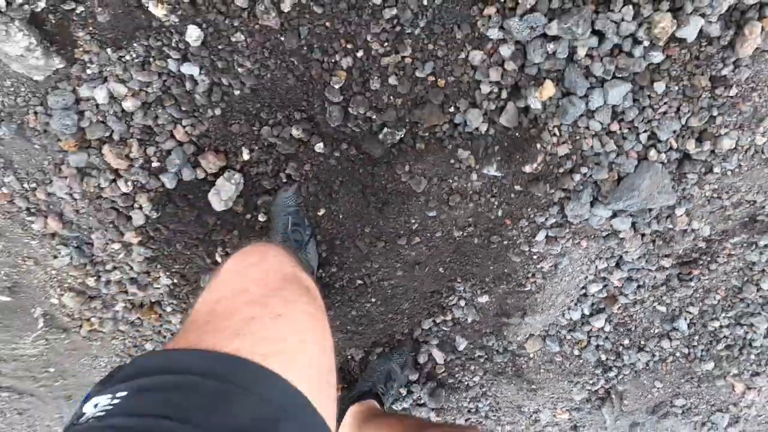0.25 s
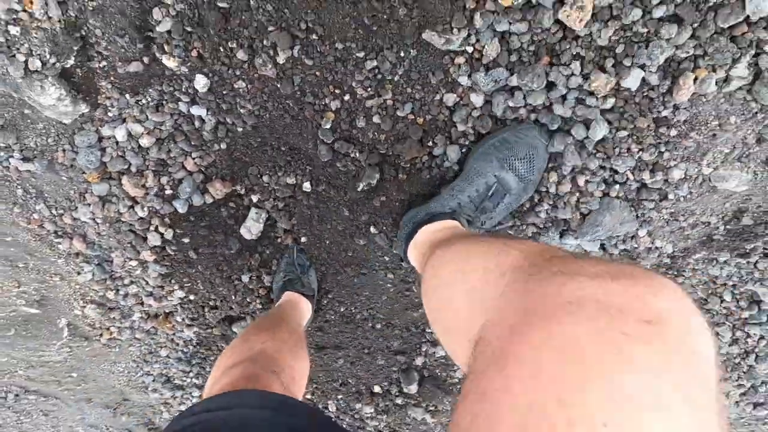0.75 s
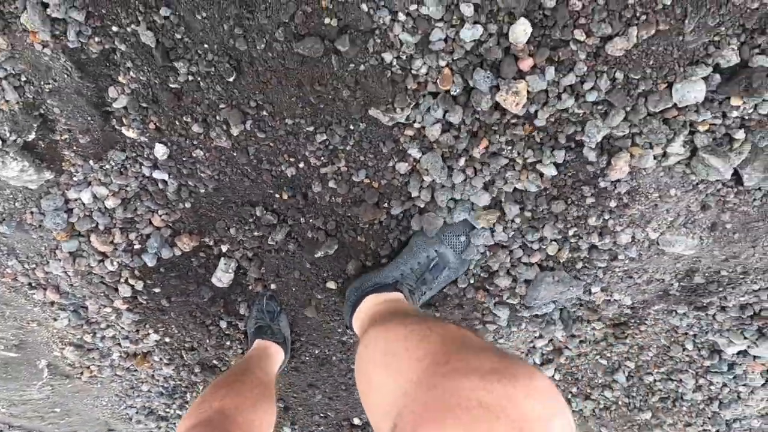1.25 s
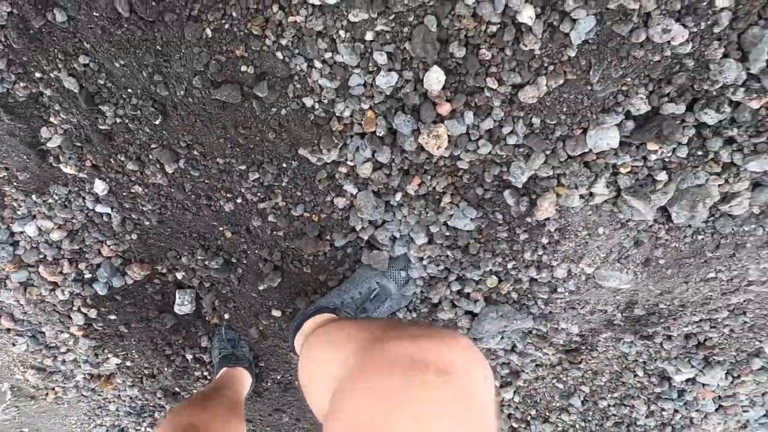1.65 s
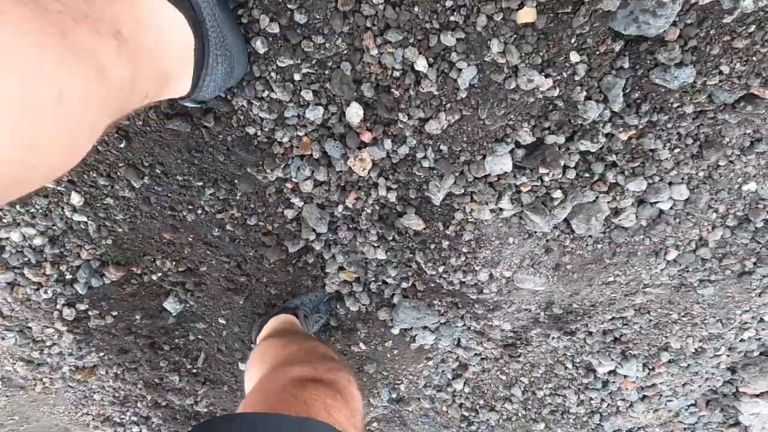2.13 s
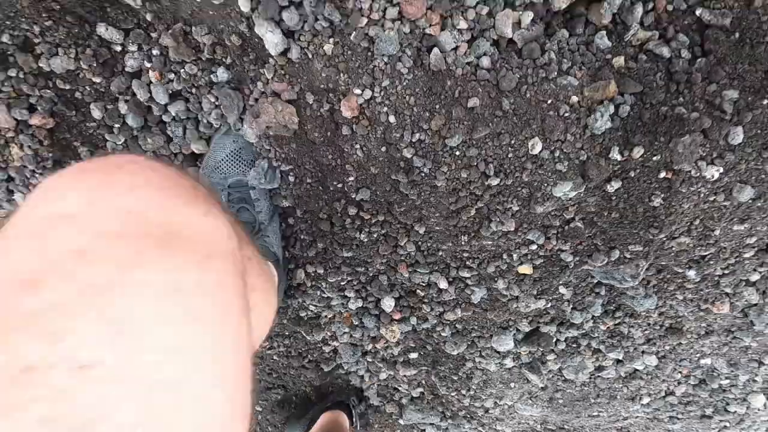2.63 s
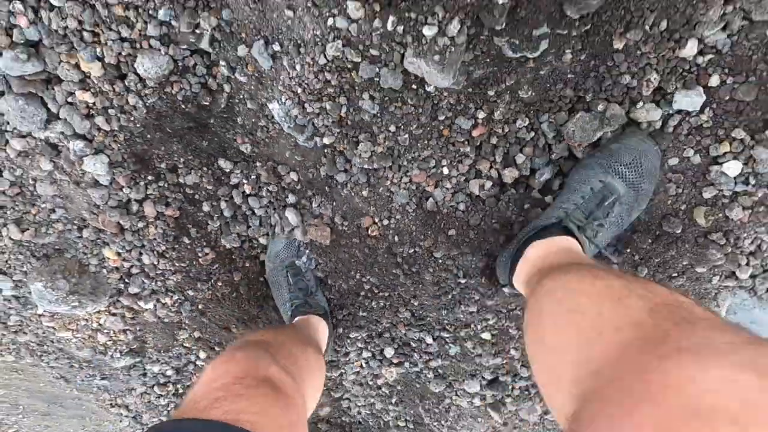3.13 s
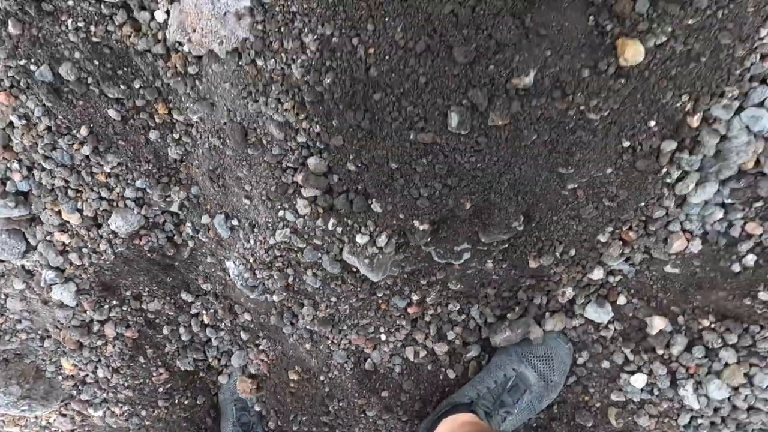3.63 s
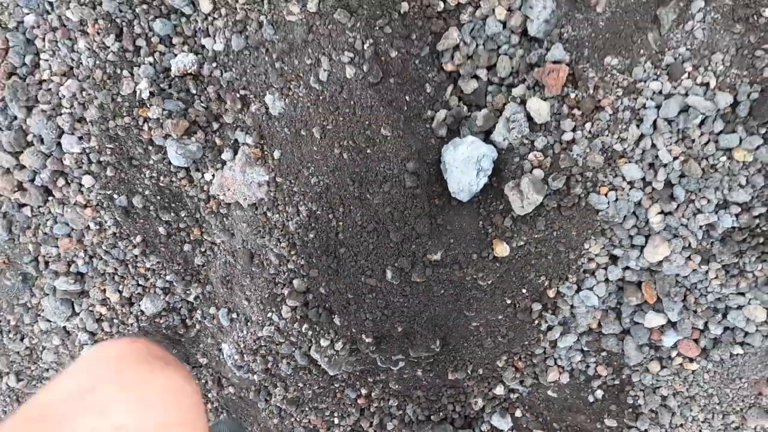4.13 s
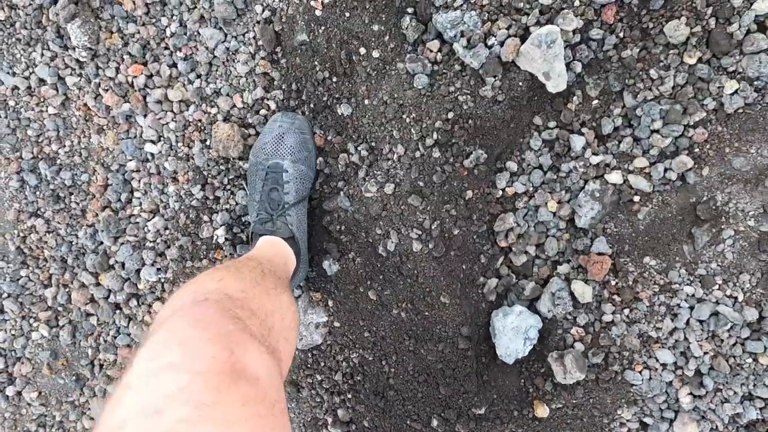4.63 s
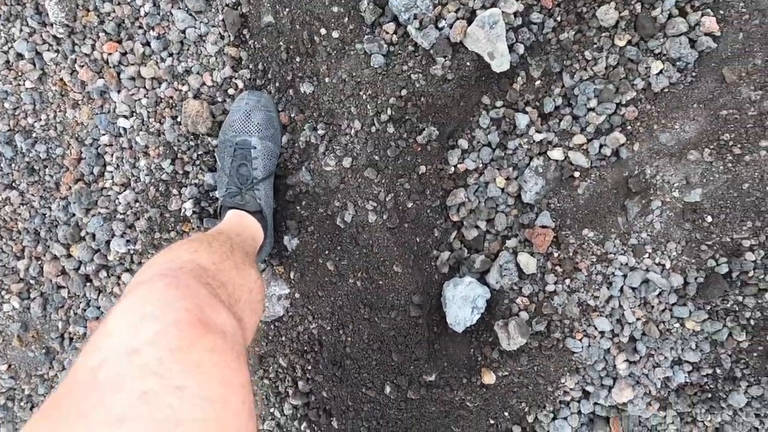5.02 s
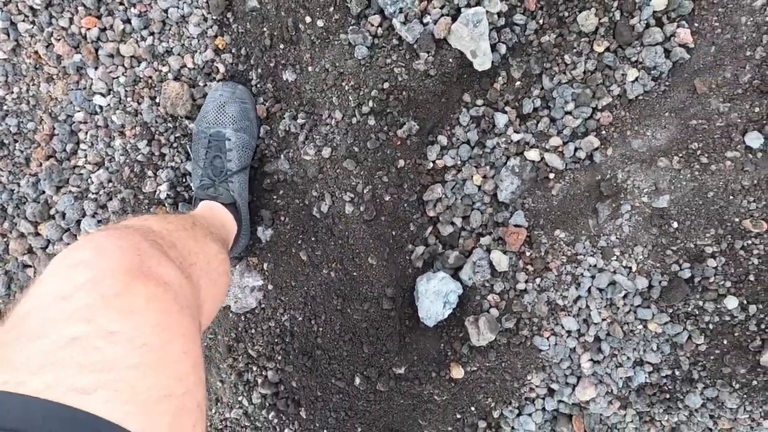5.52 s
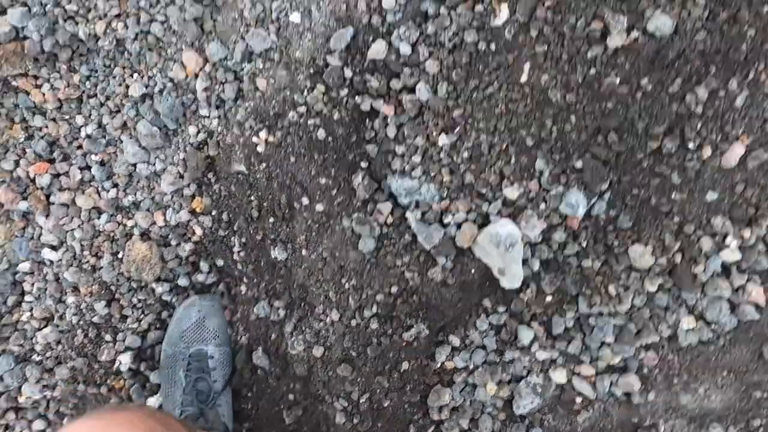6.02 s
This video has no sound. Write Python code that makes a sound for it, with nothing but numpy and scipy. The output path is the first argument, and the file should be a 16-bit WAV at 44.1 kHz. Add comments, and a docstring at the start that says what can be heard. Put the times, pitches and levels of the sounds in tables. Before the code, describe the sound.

On an open, echo-free slope, gravel is already sliding at 0 s under a low gust, with a sharp stone click at 0.13 s. A wind thump follows near 0.4 s, then a shoe crunches in at 0.6 s and pebbles and grit run back, with lighter shuffles and clicks until 2 s. A fuller, brighter crunch lands at 2.1 s, with rattling slides to about 2.8 s while the wind nearly dies. Another short push and a click come around 3.15 s, then softer shifting gravel and faint rasps as the wind rises. A heavy crunch hits at 4.4 s. The climber then nearly pauses: stones only trickle under strong rumbling, fluttering wind, with a big thud at 4.7 s. From 5.6 s dry clicks gather, gravel slides again, and two hard knocks and a sharp wind slap arrive near 6 s before the last stones run down to 6.27 s.

```python
"""A gust of wind, a sharp stone click and gravel already running downhill open the scene.
Then someone climbs a steep slope of loose volcanic gravel: each shoe crunches in and slides back.
Gravel is made of random collisions that ring in bands from coarse bed to fine sand; single stones click.
Shaped noise makes the wind that rumbles, flutters and slaps on the port of a microphone at chest height."""
import sys
import numpy as np
from scipy import signal
from scipy.fft import rfft, irfft, next_fast_len
from scipy.io import wavfile
from scipy.ndimage import uniform_filter1d

SR = 44100
rng = np.random.default_rng(int(sys.argv[2]) if len(sys.argv) > 2 else 0)


def generate_wav(sig):
    """Save sig (samples, or channels by samples) to the path in sys.argv[1] as 16-bit PCM at SR."""
    pcm = np.round(np.clip(np.atleast_2d(sig).T, -1, 1) * 32767).astype(np.int16)
    wavfile.write(sys.argv[1], SR, pcm)


N = 276462
TIME = np.arange(N) / SR   # seconds
CUTOFF_HZ = 15500

# the unsettled wind under the gusts rises and dips, nearly dies in mid-climb, then freshens:
# time_s, rumble_db
BREEZE = [(0, -33.5), (.1, -46), (.4, -41), (1.0, -33.5), (1.3, -44), (1.6, -36), (1.85, -47), (2.1, -46),
          (2.42, -56), (2.58, -48), (2.85, -51.5), (3.1, -47.5), (3.3, -36.5), (4.15, -36.5), (4.45, -23.5),
          (4.95, -24.5), (5.4, -18.5), (5.65, -29.5), (6.27, -26)]
BREEZE_FLUTTER_DB = -10.5   # relative to the rumble of the breeze
# gusts that swell and pass: peak_s, half_width_s, rumble_db, flutter_db (relative to the rumble)
GUSTS = [(0.217, 0.037, -17, -2.5), (.345, 0.05, -22.5, -8), (.735, 0.05, -29, -9),
         (.925, 0.011, -31, -0.5), (1.07, .04, -35, -22), (1.375, 0.014, -30, -11),
         (1.491, 0.032, -30.5, -11.5), (1.92, 0.022, -29.5, -11), (2.28, 0.03, -46.5, 2),
         (2.756, 0.014, -39.5, -3), (2.93, 0.048, -37.5, -4.5), (3.32, 0.041, -31, -3.5),
         (3.545, 0.035, -23, -7.5), (3.705, 0.061, -32.5, -1), (3.96, 0.027, -30, -8),
         (4.104, 0.018, -27.5, -2), (4.308, 0.047, -21.5, -5), (4.464, 0.028, -18.5, -7),
         (4.628, 0.027, -17.5, -5.5), (4.801, 0.051, -19.5, 0.5), (5.035, 0.014, -21.5, -9),
         (5.13, 0.026, -20.5, 4), (5.28, 0.081, -27.5, 4), (5.51, 0.097, -21.5, -12.5),
         (5.68, 0.013, -20.5, -18), (5.85, 0.018, -24.5, -4), (6.027, 0.03, -17.5, -3.5),
         (6.11, 0.033, -26.5, -24)]
GUST_RISE, GUST_FALL = 0.68, 1.16   # shares of the half-width: a gust arrives faster than it leaves
# colour of the large eddies: pitch_hz, relative_level_db (per Hz)
RUMBLE_COLOUR = [(8, -16), (23, 3), (45, 8.5), (80, 4.5), (125, 2), (180, -9), (250, -12), (500, -64),
                 (4000, -110)]
# colour of the small eddies: pitch_hz, relative_level_db (per Hz)
FLUTTER_COLOUR = [(100, -15), (170, 8), (225, -1.5), (310, -1), (420, -9), (600, -19), (1000, -35),
                  (2500, -91), (10000, -105)]
# slaps of air, hard and soft, from thuds to sharp flaps: middle_s, level_db, width_s, reach_hz
BUFFETS = [(0.409, -15, 0.0031, 218), (0.529, -25.5, 0.011, 133), (1.483, -24.5, 0.0049, 180),
           (1.923, -22.5, 0.0026, 210), (2.917, -33.5, 0.0031, 1100), (3.345, -23, 0.0034, 186),
           (3.776, -19, 0.0026, 176), (4.318, -31, 0.0029, 640), (3.507, -16, 0.0029, 192),
           (4.345, -16.5, 0.0044, 215), (4.722, -8, 0.0032, 175), (4.721, -29.5, 0.004, 790),
           (4.798, -24.5, 0.0076, 790), (4.834, -22.5, 0.0049, 576), (4.913, -23.5, 0.0022, 540),
           (5.122, -31, 0.013, 600), (5.163, -17, 0.004, 278), (5.25, -33, 0.0017, 596),
           (5.267, -22.5, 0.0045, 565), (5.329, -33, 0.0033, 900), (5.41, -26.5, 0.0017, 900),
           (5.592, -17, 0.0092, 275), (5.592, -19, 0.0021, 844), (5.766, -16, 0.0046, 154),
           (6.03, -10.5, 0.0014, 473), (6.146, -18, 0.0079, 197)]

# larger stones knocking together: start_s, peak_db, pitch_hz
KNOCKS = [(0.13, -14, 2200), (0.829, -21, 1780), (0.8563, -21, 3020), (1.174, -24.5, 3300),
          (1.2795, -24, 2120), (1.329, -22.5, 2330), (1.5257, -17.5, 4900), (1.7553, -14.5, 2180),
          (2.1015, -15, 2380), (2.309, -21, 1210), (2.327, -31, 2350), (2.41, -23, 2200),
          (2.7477, -19, 5300), (2.9304, -30, 2400), (3.1787, -14, 2660), (3.442, -26, 3470),
          (3.9645, -15.5, 3470), (4.177, -22, 1840), (5.0205, -25.5, 2800), (5.354, -29.5, 2500),
          (5.5051, -31.5, 5150), (5.6516, -22.5, 3830), (5.7047, -18.5, 2530), (5.7438, -22, 2120),
          (5.9786, -13, 2500), (6.0004, -11, 2270)]
# further knocks at random, like those above, harder while the grit runs
STRAY_KNOCK_DB, STRAY_SPREAD_DB = -24, 1.5   # usual peak with the grit at -39 dB; random scatter
STRAY_FOLLOWS = 0.41   # share of the grit's swing in dB
STRAY_HZ, STRAY_OCTAVES = 2800, 0.22   # usual pitch; random scatter
# the sole rasps over stones: middle_s, width_s, level_db, pitch_hz, glide_octaves_per_s
SCRAPES = [(0.62, 0.011, -35.5, 1980, 0.093), (1.32, 0.039, -53, 2190, 0), (2.398, 0.011, -45, 1900, -0.22),
           (3.43, 0.076, -53.5, 4260, -1.03), (3.678, 0.16, -44, 1400, .9),
           (4.132, 0.056, -42, 1950, -0.41), (5.775, 0.0057, -35, 2913, 0.3),
           (6.226, 0.059, -36.5, 1460, -0.66)]

# loose stones trickle between steps and almost stop while the climber stands: time_s, strength_db
TRICKLE = [(0, -44.5), (.55, -50.5), (1.5, -53.5), (2.05, -48), (2.85, -55.5), (3.3, -55), (4.3, -52),
           (4.7, -55), (5.3, -62), (5.47, -66.5), (5.6, -56), (6.27, -47.5)]
USUAL_TRICKLE_DB = -54
# levels at the usual trickle: bed_db, pebbles_db, grit_db, sand_db
TRICKLE_CLASSES_DB = [-58, -54.5, -52, -62.5]
# share of the trickle's swing in dB, the sand stops first: bed, pebbles, grit, sand
TRICKLE_FOLLOWS = [0.62, 0.61, 1.05, 1.3]
# a shoe pushes gravel downhill: start_s, rise_s, hold_s, fall_by_60_db_s, pebbles_db,
# then relative to the pebbles: bed_db, grit_db, sand_db
SLIDES = [(-.1, 0.17, .17, 0.92, -31.5, -1.5, -3.5, -30), (0.621, 0.054, 0.24, 1, -38, -5.5, 2.5, -14.5),
          (1.02, 0.079, 0.03, 0.27, -40.5, -3.5, 1, -17), (1.219, 0.075, 0.058, 0.51, -45, -2, 2.5, -29.5),
          (1.599, 0.18, .03, 0.68, -38, 1, -1, -35), (1.76, 0.079, 0.11, 0.39, -51, 15.5, 4.5, -7),
          (2.119, 0.031, 0.012, 0.12, -32.5, -3.5, -8.5, -27),
          (2.239, .16, 0.0094, 0.55, -37.5, -4.5, -4.5, -16),
          (2.478, 0.077, 0.14, 0.33, -36, -1, -0.5, -15.5), (2.89, 0.036, .01, 0.3, -49.5, 3, -2, -10),
          (2.99, 0.047, 0.12, 0.94, -46.5, -1.5, -1.5, -12), (3.118, 0.054, 0.0062, 0.3, -31, 1, 1.5, -17),
          (3.369, 0.077, 0.25, 1, -44, -0.5, 0, -23), (3.82, 0.082, 0.27, 0.21, -42, -1, 0, -19),
          (4.384, 0.04, 0.029, 0.17, -28, -2, -2, -21.5), (4.499, 0.034, 0.084, 0.21, -45, 1, -1.5, -19),
          (4.75, 0.044, 0.096, 1, -53, 4, 0.5, -13), (5.03, 0.074, 0.082, 0.64, -44.5, -4, -2.5, -26),
          (5.25, 0.055, 0.073, 0.34, -55.5, 3, -3.5, -14), (5.58, 0.11, .12, .5, -49, -10, 2, -33),
          (5.808, 0.059, .2, .5, -37.5, -5, 4, -20), (6.058, 0.075, 0.062, 0.99, -31.5, -6.5, -2, -27)]
TIRING_DB_PER_S = 8.5   # a slide loses strength as the gravel packs under the sole
# a shoe bites into the slope: start_s, attack_s, fall_by_60_db_s, bed_db, pebbles_db, grit_db, sand_db
FOOTFALLS = [(0.613, 0.0022, 0.076, -51, -37, -31, -59), (.621, .002, 0.074, -40, -33, -38, -62),
             (0.648, 0.0043, 0.28, -69, -66, -40, -47), (2.085, 0.003, 0.56, -37.5, -31.5, -32, -38.5),
             (2.099, 0.0058, 0.16, -27.5, -37, -38, -46), (3.160, 0.014, 0.076, -42, -49, -48, -57),
             (4.367, 0.0035, 0.2, -33, -27.5, -33.5, -50), (4.39, 0.0074, 0.22, -29, -42, -36.5, -49)]
# colour of the gravel: pitch_hz, relative_level_db (per Hz)
GRAVEL_COLOUR = [(150, 16.5), (300, 2), (520, 3), (760, 2.5), (1050, 9), (1450, 10), (2200, 9), (3200, 7),
                 (4400, 4), (5600, 4), (7300, 2), (8000, -9.5), (11000, -20.5), (15500, -30)]
# level of the highest hiss: time_s, level_db (relative to the sand)
SHEEN = [(0, -25), (.6, -16), (1.2, -11), (2.1, -13.5), (4.35, -7.5), (4.5, -20), (5.5, -24), (6.27, -16)]


def from_db(db):
    """Decibels to gain."""
    return 10 ** (np.asarray(db) / 20)


def rms_one(x):
    """Scales to an rms (average strength) of 1."""
    return x / np.sqrt(np.mean(x ** 2) + 1e-20)


def in_time(rows):
    """Reads each column of a curve at every sample."""
    s, *columns = np.transpose(rows)
    return [np.interp(TIME, s, column) for column in columns]


def decay(falls):
    """A dying sound: each whole fall is 60 dB."""
    return np.exp(-np.log(1000) * falls)


def coloured(x, spectrum):
    """Filters to the given spectrum, with no sound ahead of its cause (minimum phase)."""
    size = next_fast_len(N + 8192, True)
    hz, db = np.transpose(spectrum)
    bins_hz = np.arange(size // 2 + 1) * SR / size
    gain = from_db(np.interp(np.log(bins_hz + 1), np.log(hz), db))
    # folding the cepstrum forward in time gives the minimum phase
    cepstrum = irfft(np.log(gain), size)
    cepstrum[1:size // 2] *= 2
    cepstrum[size // 2 + 1:] = 0
    response = np.exp(rfft(cepstrum))
    return irfft(rfft(x, size) * response, size)[:N]


def band(x, low_hz, high_hz, order=2):
    """Keeps one band of pitches, its upper edge below half the sample rate."""
    edges_hz = [low_hz, min(high_hz, .45 * SR)]
    sos = signal.butter(order, edges_hz, "band", fs=SR, output="sos")
    return signal.sosfilt(sos, x + 1e-18)


def drift(per_s):
    """Wanders at random with a spread of 1, joining new values by straight lines."""
    values = rng.standard_normal(4096)
    return np.interp(TIME * per_s, np.arange(4096), values) * np.sqrt(3 / 2)


def evened(x, span_s):
    """Keeps the fine texture but holds the level near 1 over the given span."""
    size = max(int(span_s * SR), 2)
    power = uniform_filter1d(uniform_filter1d(x ** 2, size), size)
    return x / np.sqrt(np.abs(power) + 1e-14)


def ring(clicks, hz, cycles):
    """A struck stone rings for a few cycles before it is 60 dB down."""
    w = 2 * np.pi * min(hz, .45 * SR) / SR   # turn per sample
    r = decay(w / (2 * np.pi * cycles))   # what remains after one sample
    return signal.lfilter([1, 0, -1], [1, -2 * r * np.cos(w), r * r], clicks + 1e-18) / 2


def contacts(per_s, spread_db):
    """Random collisions: many weak, a few strong."""
    strengths = from_db(spread_db * np.minimum(rng.exponential(1, N), 5))
    signs = rng.choice([-1, 1], N)
    return strengths * signs * (rng.random(N) < per_s / SR)


def grains(clicks, low_hz, high_hz, cycles, count=10, patchy_db=3.0):
    """Deals collisions to stones of different sizes in one class; the mix of sizes keeps shifting."""
    dealt = rng.integers(0, count, N)
    stones = 0
    for k, hz in enumerate(np.geomspace(low_hz, high_hz, count)):
        ringing = rms_one(ring(clicks * (dealt == k), hz, cycles))
        stones += ringing * np.sqrt(hz) * from_db(patchy_db * drift(25))
    return rms_one(stones)


def airflow():
    """Strength of the rumble and of the flutter: gusts swell and pass on top of the breeze."""
    breeze_db, = in_time(BREEZE)
    power = np.outer(from_db([0, BREEZE_FLUTTER_DB]), from_db(breeze_db)) ** 2
    for s, width, level_db, flutter_db in GUSTS:
        near = np.abs(TIME - s) < .4
        age = TIME[near] - s
        side_width = width * np.where(age < 0, GUST_RISE, GUST_FALL)
        swell = np.exp(-(age / side_width) ** 2)
        power[:, near] += np.outer(from_db([level_db, level_db + flutter_db]) ** 2, swell)
    return np.sqrt(power)


def wind():
    """Large eddies rumble in lumps; small ones flutter in bursts."""
    rumbling, fluttering = airflow()
    rumble = evened(coloured(rng.standard_normal(N), RUMBLE_COLOUR), .028)
    lumps = from_db(2.0 * drift(70) + 0.46)
    bursts = rng.standard_normal(N) * from_db(7.8 * drift(90))
    flutter = evened(coloured(bursts, FLUTTER_COLOUR), 0.024)
    return rumble * lumps * rumbling + flutter * fluttering


def buffets():
    """A single eddy slaps the port: the smaller it is, the higher its noise reaches."""
    out = np.zeros(N)
    for s, level_db, width, reach_hz in BUFFETS:
        near = np.abs(TIME - s) < .2
        noise = rng.standard_normal(N)[near]
        swirl = evened(band(noise, 6.3 * np.sqrt(reach_hz), reach_hz, order=3), 2 / reach_hz)
        out[near] += from_db(level_db) * swirl * np.exp(-.5 * ((TIME[near] - s) / width) ** 2)
    return out


def stray_knocks(grit_db, count=40):
    """Further stones meet at random moments: rows of start_s, peak_db, pitch_hz."""
    s = rng.uniform(0, TIME[-1], count)
    strength, size = rng.standard_normal((count, 2)).T
    grit_swing_db = np.interp(s, TIME, grit_db) + 39
    peak_db = STRAY_KNOCK_DB + STRAY_FOLLOWS * grit_swing_db + STRAY_SPREAD_DB * strength
    hz = STRAY_HZ * 2 ** (STRAY_OCTAVES * np.clip(size, -2, 2))
    return list(zip(s, peak_db, hz))


def knocks(rows):
    """Porous stones give a dry, heavily damped click, then chatter briefly as they settle."""
    size = 2048   # samples for one click
    out, age = np.zeros(N + size), np.arange(size) / SR
    for s, peak_db, hz in rows:
        touched = rng.random(size) < 2000 / SR   # 2000 touches per second
        chatter = rng.standard_normal(size) * touched * np.exp(-age / 0.0059)
        touches = signal.unit_impulse(size) + 0.24 * chatter
        # larger stones touch more softly: the band follows the pitch
        click = band(ring(touches, hz, cycles=2.5), 0.21 * hz, 1.53 * hz)
        at = int(s * SR)
        out[at:at + size] += from_db(peak_db) * click / np.abs(click).max()
    return out[:N]


def scrapes():
    """Stick and slip under the sole excites one broad resonance, which glides as the shoe moves on."""
    out = np.zeros(N)
    for s, width, level_db, hz, glide in SCRAPES:
        ringing = ring(contacts(2800, spread_db=4.5), hz, cycles=11)
        rasp = evened(band(ringing, hz / np.sqrt(2), hz * np.sqrt(2)), 0.044)
        # reading the rasp faster or slower moves its pitch
        speed = 2 ** (glide * np.clip(TIME - s, -3 * width, 3 * width))
        gliding = np.interp(np.cumsum(speed) % N, np.arange(N), rasp)
        out += from_db(level_db) * gliding * np.exp(-.5 * ((TIME - s) / width) ** 2)
    return out


def slides():
    """Strength of sliding per size class: a push builds up, tires and runs out into the trickle."""
    trickle_db, = in_time(TRICKLE)
    swing_db = np.outer(TRICKLE_FOLLOWS, trickle_db - USUAL_TRICKLE_DB)
    power = from_db(swing_db + np.array(TRICKLE_CLASSES_DB)[:, None]) ** 2
    for s, rise, hold, t60, level_db, bed_db, grit_db, sand_db in SLIDES:
        age = TIME - s - rise
        tiring = from_db(-TIRING_DB_PER_S * np.clip(age, 0, hold))
        shape = np.clip((TIME - s) / rise, 0, 1) * tiring * decay(np.clip((age - hold) / t60, 0, 2))
        levels_db = level_db + np.array([bed_db, 0, grit_db, sand_db])
        power += np.outer(from_db(levels_db) ** 2, shape ** 2)
    return np.sqrt(power)


def footfalls():
    """Strength of the crunch per size class: a quick bite that dies as the shoe beds in."""
    strength = np.zeros((4, N))
    for s, attack, t60, *levels_db in FOOTFALLS:
        bite = np.clip((TIME - s) / attack, 0, 1)
        shape = bite * decay(np.maximum(TIME - s - attack, 0) / t60)
        strength += np.outer(from_db(levels_db), shape)
    return strength


def gravel(sliding, grit_db):
    """Stones of all sizes collide faster the harder the grit slides, and slip in small avalanches."""
    bed, pebbles, grit, sand = np.hypot(sliding, footfalls())   # slide and bite add in power
    sheen_db, = in_time(SHEEN)
    fine_grit = from_db(-0.5) * np.sqrt(grit * sand)   # between the two in size and strength
    flow = from_db(.35 * (grit_db + 40))   # multiplies every collision rate
    slips = from_db(0.84 * drift(110))
    chips = rms_one(contacts(1100 * flow, spread_db=3.5))   # sharp edges snap across all sizes at once

    def size_class(per_s, spread_db, low_hz, high_hz, cycles, chip_share):
        """Ringing stones and snapping edges in one band, at an even level."""
        stones = grains(contacts(per_s * flow, spread_db), low_hz, high_hz, cycles) + chip_share * chips
        return evened(coloured(band(stones, low_hz, high_hz, order=5), GRAVEL_COLOUR), 0.07)

    mix = bed * size_class(2800, 3.8, 184, 793, 5.3, 0.26)
    mix += pebbles * size_class(3300, 1.36, 798, 2276, 12.6, 1.1)
    mix += grit * size_class(5000, 0.94, 2200, 4960, 6.4, 0.64)
    mix += fine_grit * size_class(6000, 1.8, 4910, 7380, 12.5, 0.29)
    mix += sand * size_class(7000, 1.4, 7560, 11240, 6.3, 0.95)
    mix += sand * from_db(sheen_db) * size_class(5000, 3.4, 10840, CUTOFF_HZ, 8.6, .3)
    return slips * mix


def scene():
    """Open hillside without echoes, one channel."""
    sliding = slides()
    grit_db = 20 * np.log10(sliding[2])
    air = wind() + buffets()
    stones = knocks(KNOCKS + stray_knocks(grit_db)) + scrapes()
    return (air + stones + gravel(sliding, grit_db))[None]


def record(dry, ceiling=0.33):
    """Rounds off the strongest peaks towards the ceiling, then cuts the top."""
    rounded = dry / (1 + (dry / ceiling) ** 6) ** (1 / 6)
    top_cut = signal.ellip(10, .1, 90, CUTOFF_HZ, fs=SR, output="sos")
    return signal.sosfilt(top_cut, rounded)


dry = scene()
out = record(dry)
generate_wav(out)
```